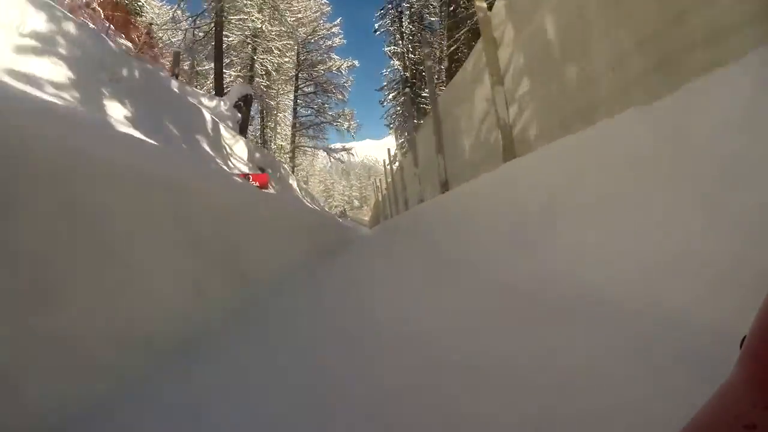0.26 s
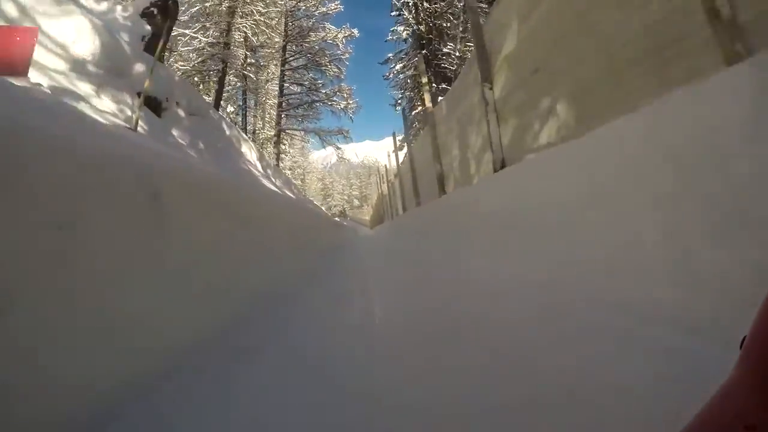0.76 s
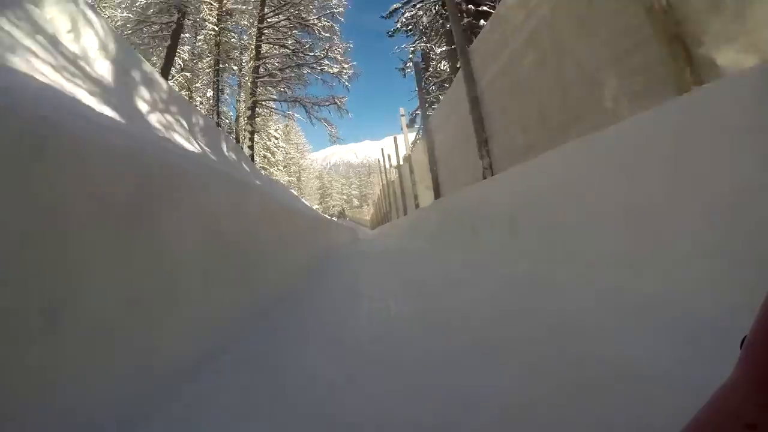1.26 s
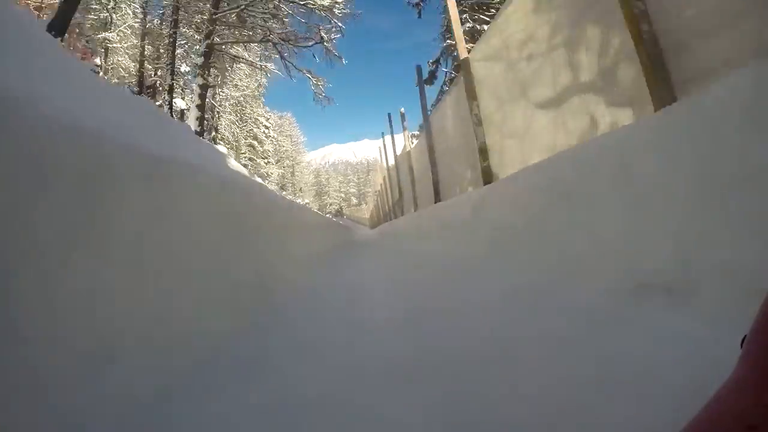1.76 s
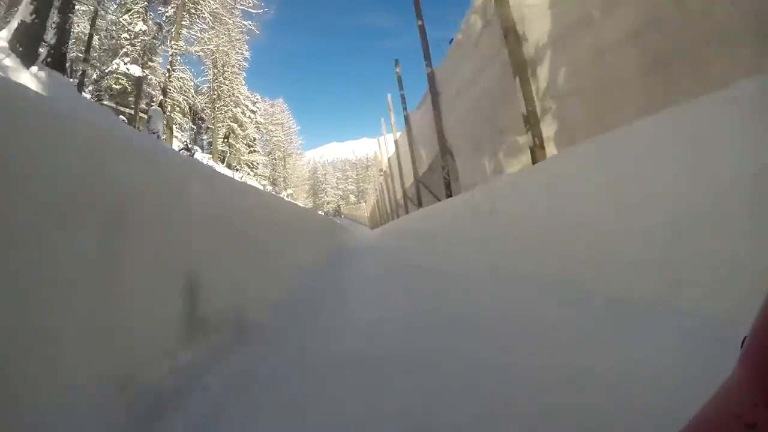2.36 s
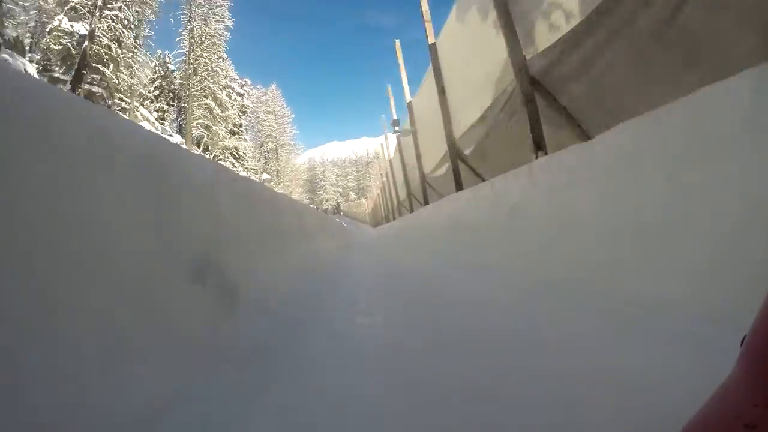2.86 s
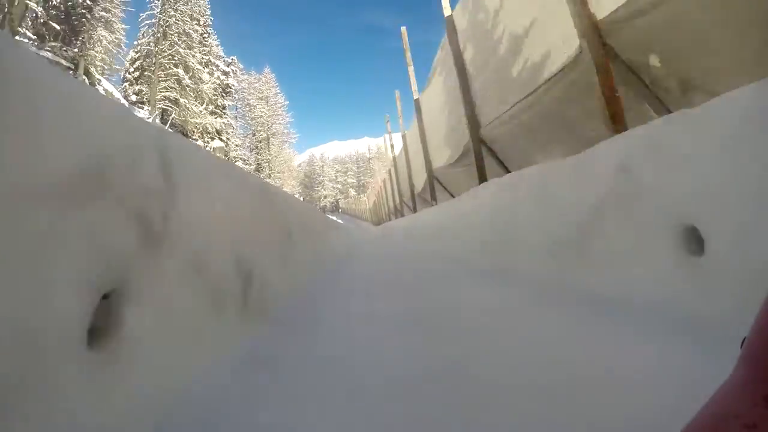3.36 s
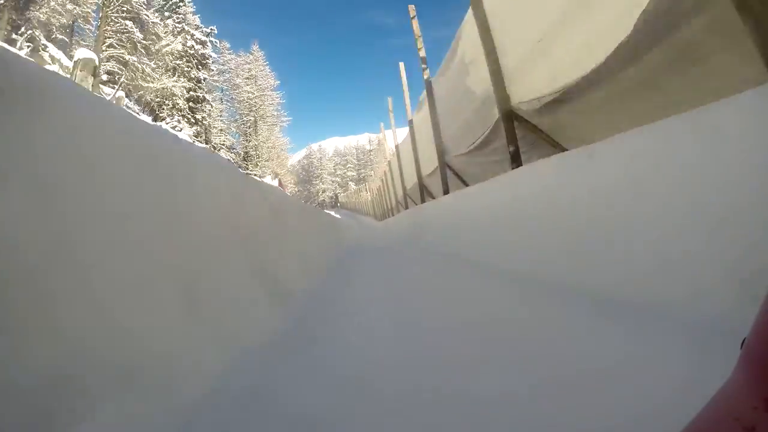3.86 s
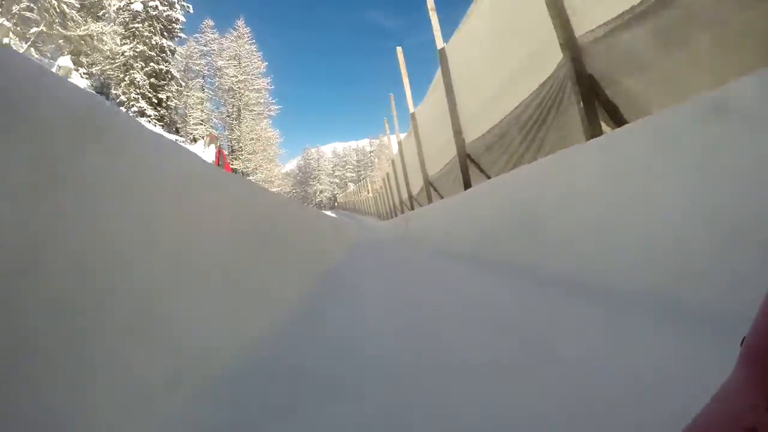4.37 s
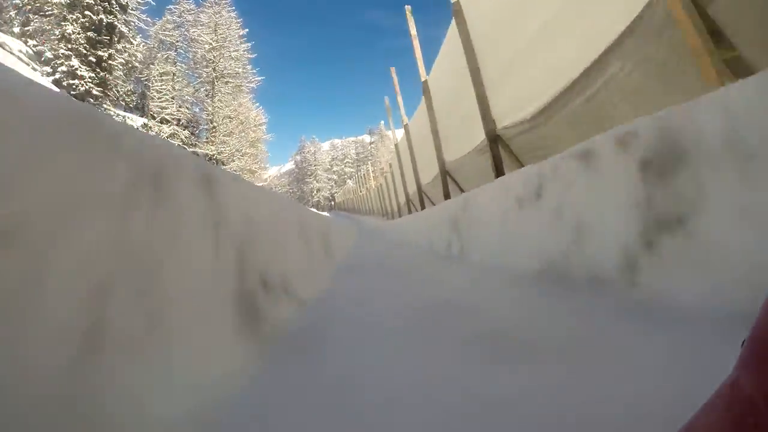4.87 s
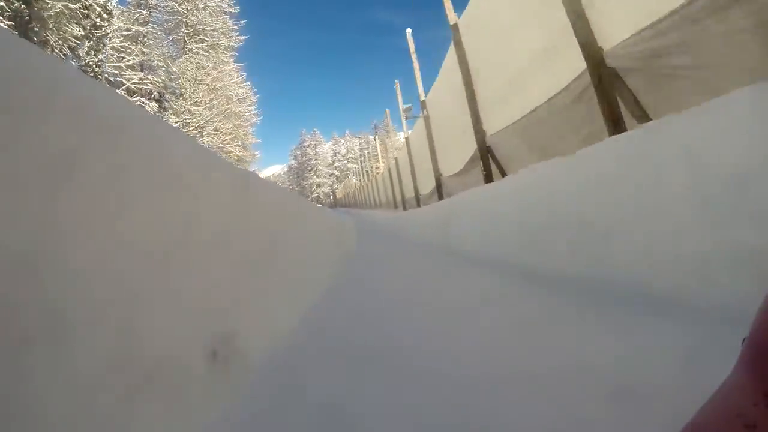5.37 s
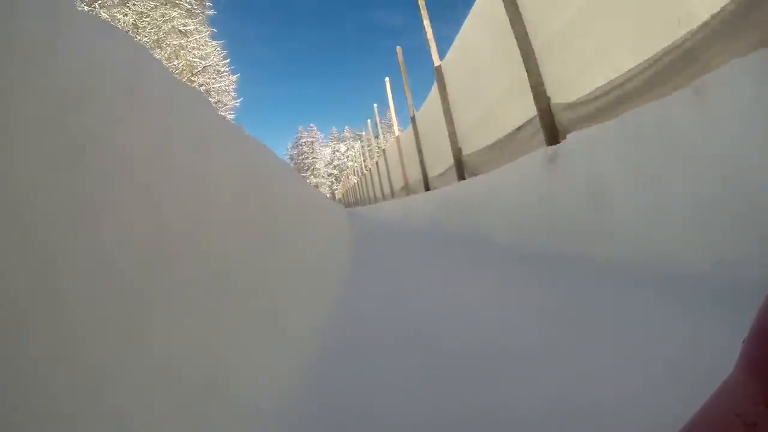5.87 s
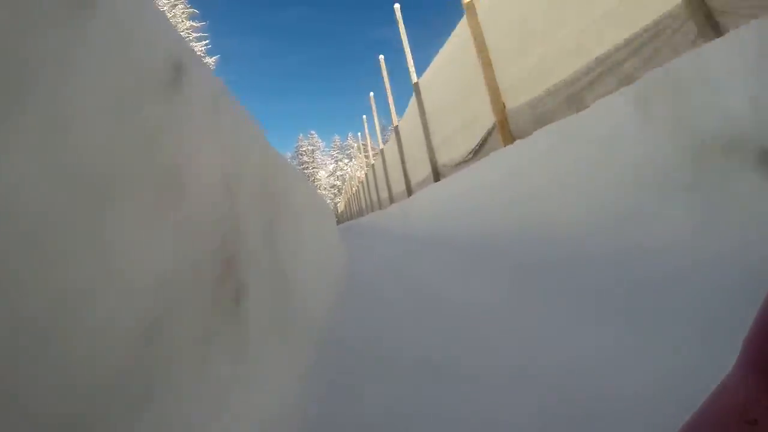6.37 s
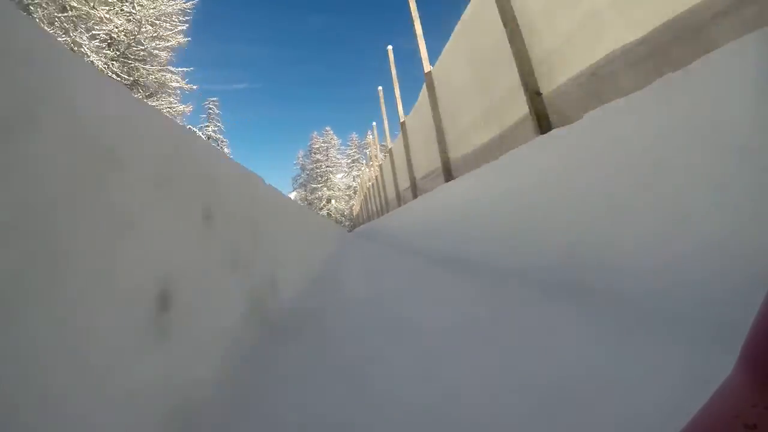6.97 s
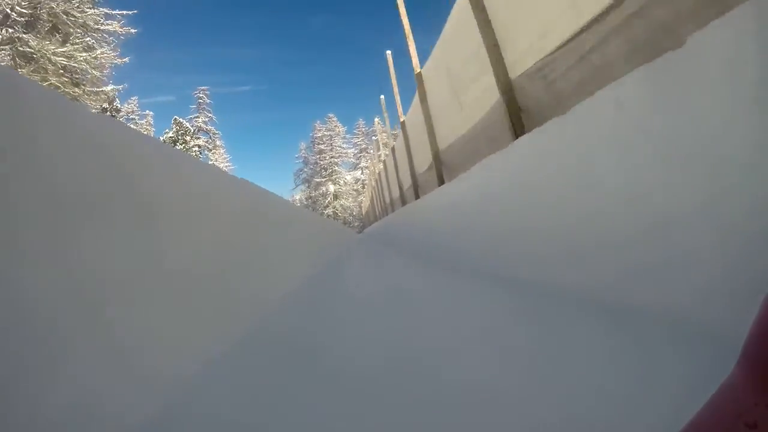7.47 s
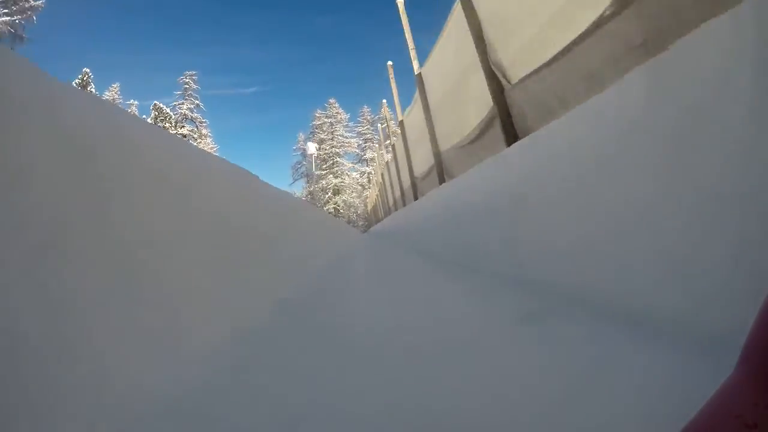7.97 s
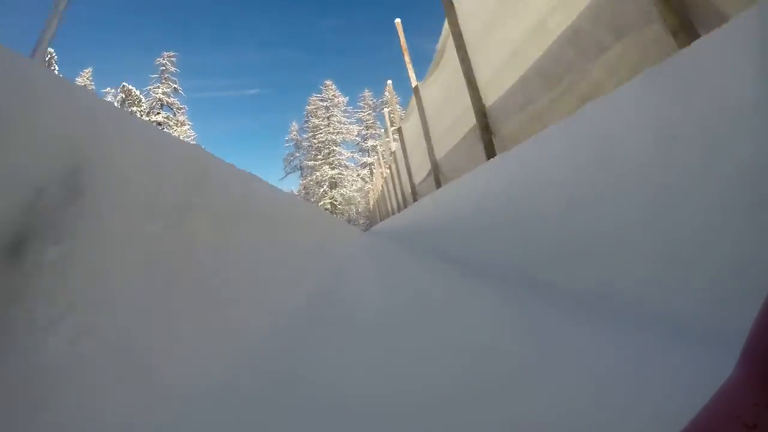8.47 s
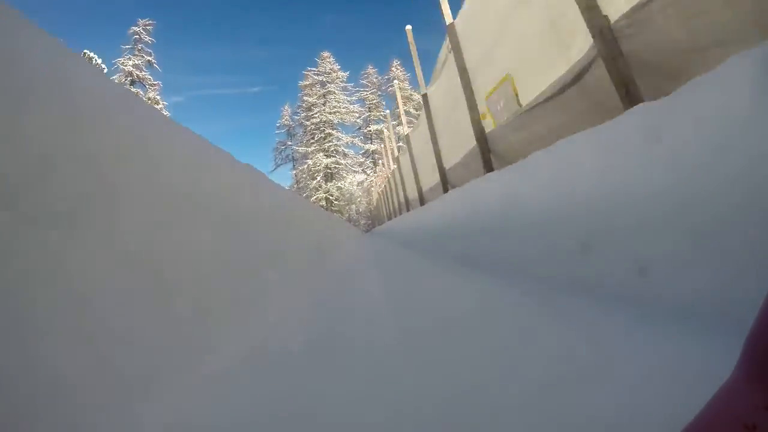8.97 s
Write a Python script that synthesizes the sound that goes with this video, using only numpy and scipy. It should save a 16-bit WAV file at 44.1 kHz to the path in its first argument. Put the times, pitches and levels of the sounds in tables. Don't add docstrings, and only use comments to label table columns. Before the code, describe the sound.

Muffled hull rumble and steel runners scraping ice surge unevenly, while loose parts chatter in short bursts and tiny ticks sound nearby.

```python
import sys
import numpy as np
from scipy import signal
from scipy.fft import rfft, irfft, next_fast_len
from scipy.io import wavfile
from scipy.ndimage import uniform_filter1d, minimum_filter1d

SR = 44100
rng = np.random.default_rng(int(sys.argv[2]) if len(sys.argv) > 2 else 0)


def put_to_file(sound):
    columns = np.atleast_2d(sound).T
    safe = np.clip(columns, -1, 1)
    whole_steps = np.round(safe * 32767)
    wavfile.write(sys.argv[1], SR, whole_steps.astype(np.int16))


def voltage_ratio(level):
    return 10 ** (np.asarray(level, float) / 20)


N = 406161


def level(x, db):
    return x * voltage_ratio(db) / np.sqrt(np.mean(x ** 2))


def ring(x, hz, width_hz):
    return signal.lfilter(*signal.iirpeak(hz, hz / width_hz, SR), x)


def ring_twice(x, hz, width_hz, second_width_hz):
    return ring(ring(x, hz, width_hz), hz, second_width_hz)


def ring_modes(x, modes):
    return sum(voltage_ratio(db) * ring(x, hz, width_hz) for hz, width_hz, db in modes)


def colour(x, points):
    hz, db = np.transpose(points)
    size = 8192
    bins_hz = np.arange(size // 2 + 1) * SR / size
    log_gain = np.interp(np.log(bins_hz + 1), np.log(hz), db) * np.log(10) / 20
    cepstrum = irfft(log_gain)
    cepstrum[1:size // 2] *= 2
    cepstrum[size // 2 + 1:] = 0
    response = irfft(np.exp(rfft(cepstrum)))
    return signal.fftconvolve(x, response)[:N]


def controls(table):
    s, *columns = np.transpose(table)
    return [np.interp(np.arange(N) / SR, s, c) for c in columns]


def spells(table, rest_db, rise_s):
    t = np.arange(N) / SR
    gain = voltage_ratio(rest_db)
    for start, length, db in table:
        inside_s = np.minimum(t - start, start + length - t)
        gain = gain + voltage_ratio(db) * np.clip(inside_s / rise_s + 0.5, 0, 1)
    return 20 * np.log10(gain)


def walk(rate):
    k = int(SR / rate)
    held = np.repeat(rng.standard_normal(N // k + 1), k)
    w = uniform_filter1d(uniform_filter1d(held, k), k)[:N]
    return w / w.std()


def grit(scatter_db):
    return level(rng.standard_normal(N) * voltage_ratio(scatter_db * rng.exponential(size=N)), 0)


def shaken(hz, width_hz, steady):
    swing = ring_twice(rng.standard_normal(N), hz, width_hz, 2 * width_hz)
    z = signal.hilbert(swing, next_fast_len(N))[:N]
    z = z / np.abs(z) ** np.clip(steady, 0, 1)
    return z / np.sqrt(np.mean(z.real ** 2))


# start in seconds, length in seconds, level in dB.
BOOMS = [(0.005, 0.14, -20), (0.262, 0.044, -16), (0.374, 1.273, -13.5), (1.69, 0.164, -12.5),
         (1.913, 0.158, -11.5), (2.113, 0.048, -10), (2.238, 0.1, -18), (2.387, 0.078, -17),
         (2.55, 0.48, -14.5), (3.153, 0.094, -15), (3.356, 0.39, -14), (3.775, 0.27, -14),
         (4.111, 0.18, -15.5), (4.363, 0.3, -15), (4.707, 0.21, -17.5), (4.983, 0.186, -15),
         (5.218, 0.35, -15), (5.632, 0.75, -16), (6.415, 0.2, -20), (6.677, 0.182, -12.5),
         (6.896, 0.26, -18), (7.229, 0.081, -14.5), (7.361, 0.37, -17), (7.78, 0.3, -16),
         (8.081, 0.31, -14.5), (8.44, 0.039, -19.5), (8.547, 0.65, -14.5)]
# frequency in Hz, density in dB per Hz.
RUMBLE_SHAPE = [(12, -33), (20, -8), (54, -7.5), (119, -8), (152, -10), (174, -4), (197, -4.5), (239, -11),
                (284, -20), (370, -14.5), (448, -27.5), (646, -12.5), (1000, -33), (1300, -37), (1690, -66),
                (2860, -120)]


def hull(grind_db):
    drum_db = spells(BOOMS, rest_db=-26, rise_s=0.04) - 3.5
    drum = shaken(172.5, 15, steady=0.22).real * voltage_ratio(drum_db)
    surge_db = 1.4 * walk(9) + 0.25 * (grind_db + 34)
    shake = grit(1.2) * voltage_ratio(2.0 * walk(25) + surge_db + 0.46 * (drum_db + 17.5))
    rumble = level(colour(shake, RUMBLE_SHAPE), -22.5)
    panels = ring_modes(shake, [(365, 23, -37), (567, 6.1, -43.5), (893, 18, -43.0)])
    flex = level(ring(rng.standard_normal(N), 88, 17), -26) * voltage_ratio(surge_db)
    return drum + rumble + voltage_ratio(19) * panels + flex


# frequency in Hz, width in Hz, level in dB.
FRAME_MODES = [(546, 150, -6), (658.6, 32.5, 5), (763, 90, -2.5), (1250, 220, -6), (1436, 21, 3.5),
               (1529.5, 40.4, 5), (1917, 92, 2), (2034, 31, 4.5), (2240, 37, -7), (2388, 36, 1.5),
               (2723, 42, -8.5), (2950, 130, -11.5), (3500, 250, -17)]
# frequency in Hz, level in dB.
GRIND_SHAPE = [(500, -35), (900, -7.5), (1100, -14.5), (1500, 0), (2000, -1), (3000, -12.5), (4300, -25),
               (7000, -17.5), (15000, -41.5)]


def runners(grind_db, hiss_db):
    contact = grit(2.0) * voltage_ratio(grind_db + 2.2 * walk(30) + 2.84 * walk(130))
    modes = ring_modes(contact, FRAME_MODES)
    broad = colour(contact, GRIND_SHAPE)
    spray = ring_twice(rng.standard_normal(N), 6310, 400, 800) * voltage_ratio(1.3 * walk(20))
    mist_db = 0.34 * hiss_db - 14 + 1.5 * walk(12)
    mist = ring(rng.standard_normal(N), 8400, 6600) * voltage_ratio(mist_db)
    return mist + voltage_ratio(3.5) * modes + voltage_ratio(12.0) * broad + level(spray, 13.2) * voltage_ratio(hiss_db)


# time in seconds, frame grind in dB, runner hiss in dB.
GLIDE = [(0, -40.5, -80), (.38, -41.5, -73), (.7, -36.5, -72), (1.43, -34.5, -70.5), (1.82, -35.5, -74),
         (2.13, -31, -67), (2.51, -39.5, -60), (2.95, -34.5, -66), (3.28, -38.5, -63), (3.95, -33, -55),
         (4.46, -34.5, -56), (5.33, -34.5, -51.5), (5.59, -28, -52), (6.16, -33.5, -60), (6.54, -34, -52.5),
         (7.18, -32.5, -49.5), (8.3, -34.5, -43.5), (9.21, -31.5, -51)]


def glide():
    return controls(GLIDE)


# time in seconds, peak in dB, chatter length in ms.
KNOCKS = [(0.0242, -7.5, 6), (0.378, -23.5, 13), (1.371, -14, 10), (1.4087, -18.5, 16), (1.484, -17.5, 7.3),
          (1.873, -18.5, 6), (2.5557, -19.5, 10), (2.8425, -21, 11), (3.137, -12.5, 9.8), (3.39, -16, 23),
          (3.638, -9.5, 3.7), (3.7354, -18, 5.9), (4.133, -9, 7.3), (4.601, -19, 17), (4.99, -19.5, 7.7),
          (5.4924, -16.5, 20), (5.8134, -15.5, 5.7), (5.916, -8.5, 3.7), (6.235, -16, 4.7),
          (6.338, -17.5, 9.2), (6.3638, -15.5, 29), (6.48, -25, 21), (7.188, -11.5, 6.5),
          (7.771, -11.5, 9.4), (7.8698, -10.5, 11), (7.957, -23, 5.8), (8.1045, -16.5, 9.6),
          (8.375, -21, 5.3), (8.454, -21, 10), (9.0477, -10.5, 19)]
# first strike in seconds, last strike in seconds, strike count, first level in dB, last in dB.
SLAPS = [(.567, .741, 4, -10, -10), (.584, .692, 3, -7, -10), (.902, .943, 2, -13.5, -8.5),
         (1.0615, 1.1184, 2, -22, -13.5), (1.257, 1.308, 2, -7, -4), (1.54, 1.58, 2, -5.5, -8.5),
         (1.955, 2.065, 3, -14.5, -9.5), (2.73, 2.79, 2, -5, -15.5), (3.61, 3.848, 6, -14, -15.5),
         (3.991, 4.04, 2, -4, -6.5), (4.526, 4.564, 2, -14.5, -10.5), (5.25, 5.397, 3, -15.5, -7.5),
         (5.515, 5.73, 5, -7.5, -5), (6.086, 6.198, 3, -13, -11), (6.505, 6.5625, 2, -7, -6),
         (6.7376, 6.7984, 2, -12, -4), (7.105, 7.264, 4, -9, -5.5), (7.308, 7.432, 3, -12.5, -12.5),
         (7.535, 7.586, 2, -10, -12), (8.22, 8.279, 2, -7.5, -4), (8.545, 8.599, 2, -15.5, -6),
         (8.657, 8.74, 3, -26, -11.5), (8.828, 8.904, 2, -16.5, -13.5), (9.071, 9.18, 3, -4.5, -11)]
# first strike in seconds, last strike in seconds, strike count, first level in dB, last in dB.
RATTLES = [(.431, .463, 2, -10.5, -10), (.7786, .839, 3, -9, -14), (1.667, 1.753, 3, -17.5, -18),
           (2.0958, 2.171, 4, -6.5, -11.5), (2.211, 2.231, 2, -6.5, -11.5), (2.668, 2.69, 2, -9, -12),
           (7.635, 7.71, 4, -14.5, -21.5), (2.3955, 2.415, 2, -23, -14), (2.921, 3.085, 8, -10, -13.5),
           (3.466, 3.488, 2, -14.5, -9.5), (3.89, 3.97, 4, -12, -11.5), (4.197, 4.259, 3, -11, -16),
           (4.408, 4.428, 2, -13.5, -13), (4.684, 4.724, 3, -15, -11), (4.876, 4.923, 3, -7, -11.5),
           (5.064, 5.113, 3, -27.5, -8.5), (5.985, 6.044, 3, -22, -12), (6.8725, 6.887, 2, -14, -11.5),
           (6.941, 7.054, 5, -14, -8.5), (8.96, 8.996, 3, -8, -4)]


def strikes():
    rows = [np.array(KNOCKS)]
    for trains, chatter_ms in ((SLAPS, 8.57), (RATTLES, 7.9)):
        for first, last, count, first_db, last_db in trains:
            step = np.linspace(0, 1, round(count))
            level_luck, length_luck = rng.standard_normal((2, len(step)))
            s = first + (last - first) * step
            db = first_db + (last_db - first_db) * step + level_luck * (step % 1 > 0)
            rows.append(np.transpose([s, db, chatter_ms * voltage_ratio(1.2 * length_luck)]))
    rows = np.concatenate(rows)
    return rows[np.argsort(rows[:, 0])].T


# frequency in Hz, width in Hz, level in dB.
PIN_MODES = [
    (5000, 130, -4),
    (5250, 100, -9),
    (5520, 90, 0),
    (7010, 60, -1),
    (10000, 500, -17),
]
# frequency in Hz, level in dB.
CLATTER_SHAPE = [(200, -40), (400, -19), (650, -11), (1050, -17.5), (1500, 2.5), (2200, -7.5), (3000, -5),
                 (4500, -36), (7500, -20), (15000, -38)]


def knocks():
    s, peak_db, length_ms = strikes()
    at = (s * SR).astype(int)
    last = np.clip(np.searchsorted(at, np.arange(N), side="right") - 1, 0, None)
    age_ms = (np.arange(N) - at[last]) / SR * 1000
    age = age_ms / np.clip(length_ms, 2, 40)[last]
    decay = np.exp(-np.abs(age / 1.214) ** 1.34) + voltage_ratio(-13.5) * np.exp(-np.abs(age) / 3.23)
    envelope = (age >= 0) * voltage_ratio(peak_db)[last] * decay
    burst = grit(1.6) * uniform_filter1d(envelope, size=230) * voltage_ratio(1.8 * walk(280) - 1)
    frame, pins = 0, 0
    for mode in FRAME_MODES:
        share = voltage_ratio(2.2 * rng.standard_normal(len(at)))
        frame = frame + ring_modes(burst * share[last], [mode])
    for mode in PIN_MODES:
        share = voltage_ratio(2.2 * rng.standard_normal(len(at))) ** 2.1
        pins = pins + ring_modes(burst * share[last], [mode])
    return voltage_ratio(5.5) * frame + voltage_ratio(-2.0) * pins + voltage_ratio(-2.5) * colour(burst, CLATTER_SHAPE)


# start in seconds, length in seconds, level in dB.
SWINGS = [(0.005, 0.32, -18.5), (0.486, 0.085, -15), (0.732, 0.19, -17.5), (1.038, 0.078, -18),
          (1.242, 0.189, -19), (1.511, 0.23, -17), (1.92, 0.08, -20), (2.085, 0.124, -25),
          (2.377, 0.067, -16), (2.86, 0.11, -17), (3.031, 0.34, -17), (3.524, 0.044, -23),
          (3.693, 1.07, -18), (4.848, 0.18, -13.5), (5.204, 0.102, -18), (5.438, 0.48, -16.5),
          (6.01, 1.85, -19), (8.132, 0.52, -21.5), (8.878, 0.43, -17)]
# time in seconds, tick level in dB.
PLAY = [
    (0, -39.5),
    (4.5, -42.5),
    (5.5, -38.5),
    (6.3, -44),
    (9.21, -43),
]


def mount():
    swing_db = spells(SWINGS, rest_db=-30, rise_s=0.085) - 2.0 + 1.7 * walk(8.3)
    tick_db, = controls(PLAY)
    z = shaken(41.0, 4.5, steady=0.94)
    ends = np.append((z.imag[:-1] < 0) & (z.imag[1:] >= 0), False)
    force = ends * voltage_ratio(tick_db + 4.5 * rng.standard_normal(N))
    shell = ring_twice(force, 11900, 1700, 2500) + voltage_ratio(-5) * ring_twice(force, 10350, 800, 1500)
    stud = ring_twice(force, 5600, 2200, 3000)
    return z.real * voltage_ratio(swing_db) + voltage_ratio(8.5) * shell + voltage_ratio(5.5) * stud


# time in seconds, peak in dB.
CHIPS = [
    (1.2439, -28.5),
    (5.9166, -34),
]


def chips():
    x = np.zeros(N)
    for s, db in CHIPS:
        x[int(s * SR)] = voltage_ratio(db + 9)
    return ring(x, 8500, 11000)


# frequency in Hz, level in dB.
HOUSING_SHAPE = [(20, 2.5), (3000, -0.5), (3800, -5.5), (4300, -12), (7000, -20.5), (7500, -30),
                 (12500, -35), (13500, -48), (15000, -57.5)]


def housing(x):
    return colour(x, HOUSING_SHAPE)


def scene():
    grind_db, hiss_db = glide()
    sled = hull(grind_db) + runners(grind_db, hiss_db) + knocks()
    return (housing(sled) + mount() + chips())[None]


def band_limit(x):
    return signal.sosfilt(signal.butter(12, 15200, fs=SR, output="sos"), x)


def record(dry):
    x = signal.sosfilt(signal.butter(3, 29.0, "high", fs=SR, output="sos"), dry)
    peak = uniform_filter1d(-minimum_filter1d(-np.abs(x), size=440), size=330)
    x = x / (1 + (peak / 0.9) ** 3) ** (1 / 3)
    return band_limit(x)


dry = scene()
out = record(dry)
put_to_file(out)
```